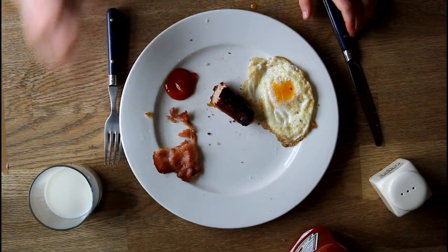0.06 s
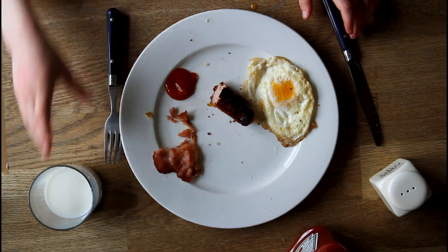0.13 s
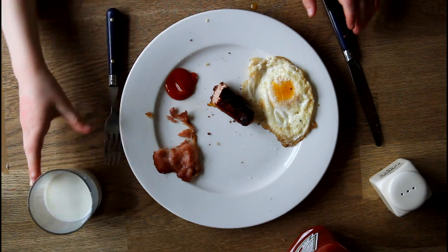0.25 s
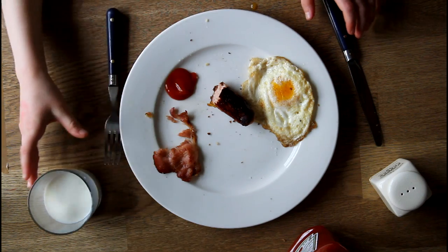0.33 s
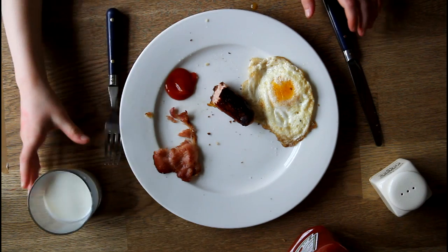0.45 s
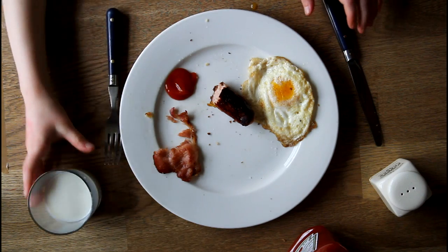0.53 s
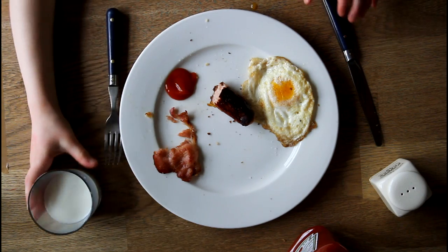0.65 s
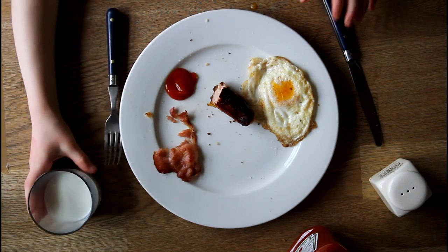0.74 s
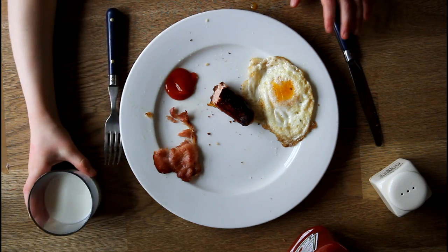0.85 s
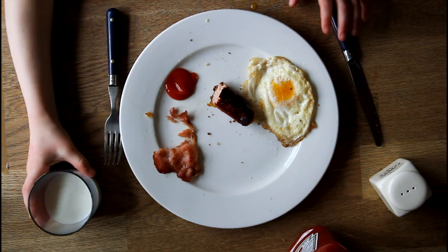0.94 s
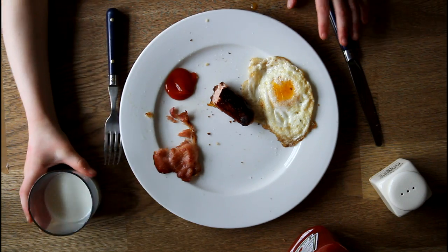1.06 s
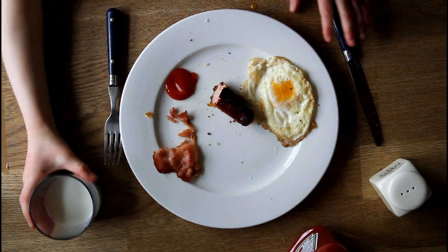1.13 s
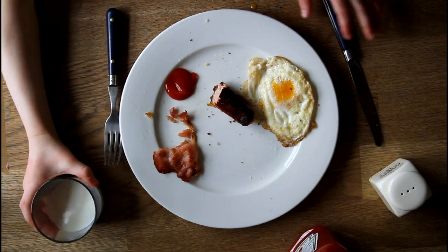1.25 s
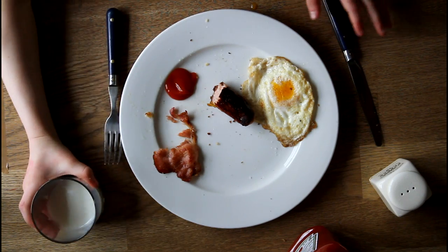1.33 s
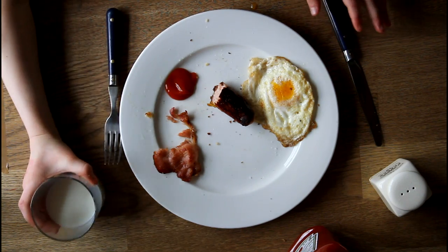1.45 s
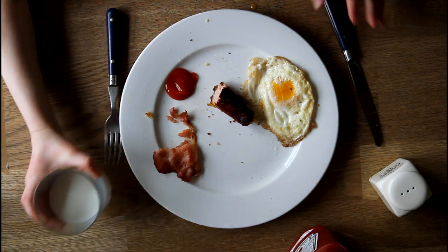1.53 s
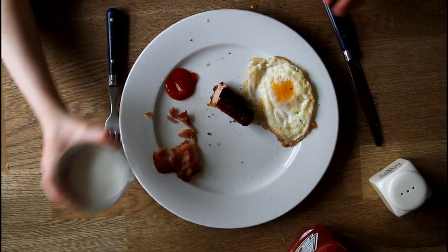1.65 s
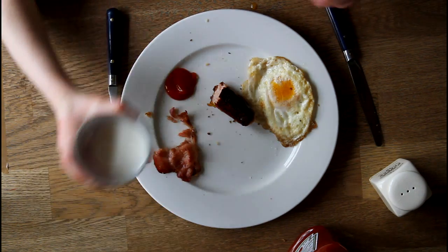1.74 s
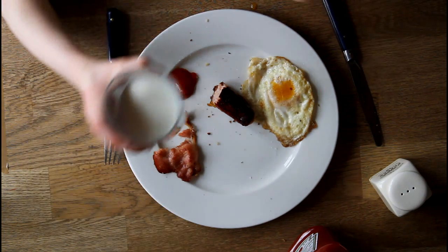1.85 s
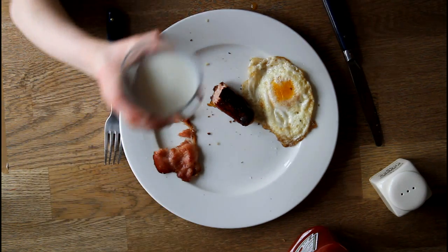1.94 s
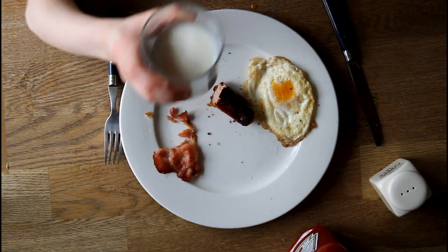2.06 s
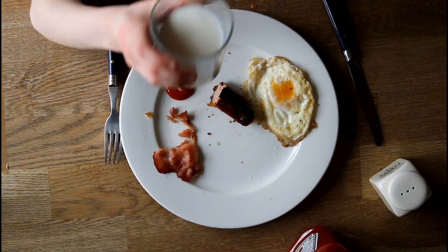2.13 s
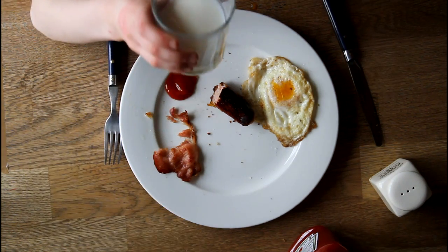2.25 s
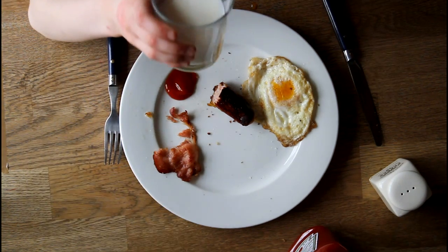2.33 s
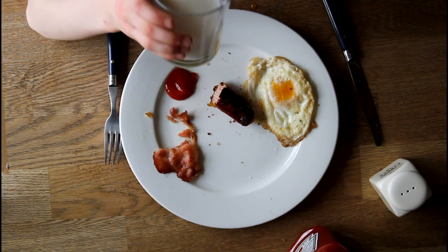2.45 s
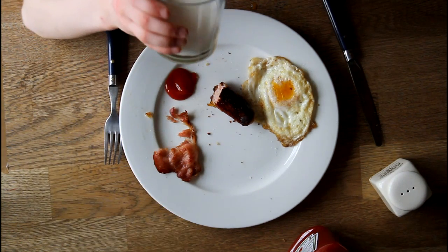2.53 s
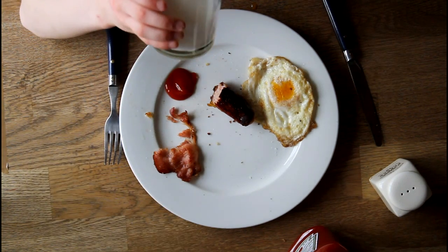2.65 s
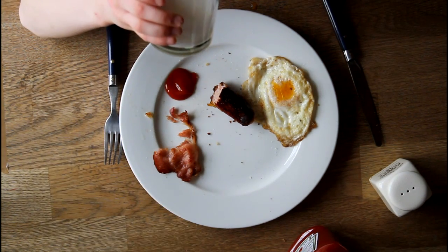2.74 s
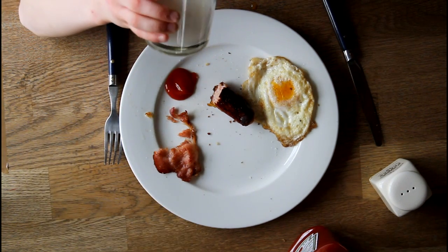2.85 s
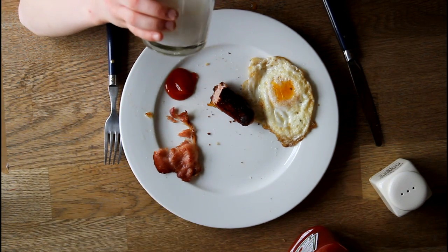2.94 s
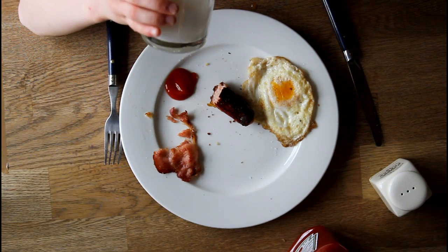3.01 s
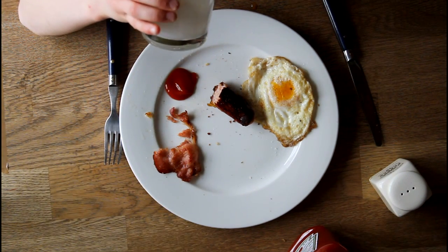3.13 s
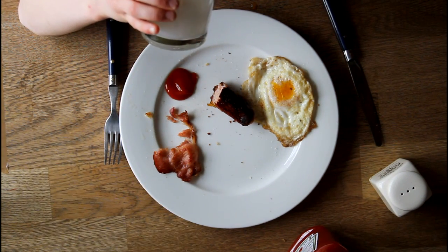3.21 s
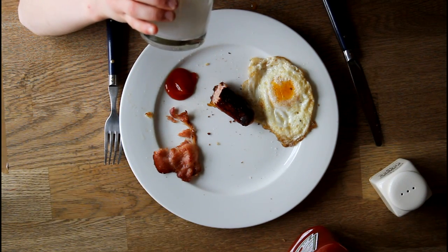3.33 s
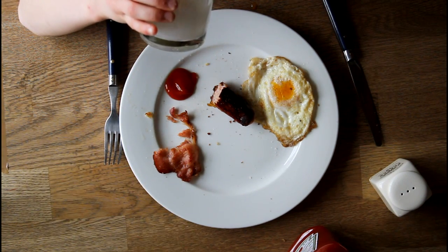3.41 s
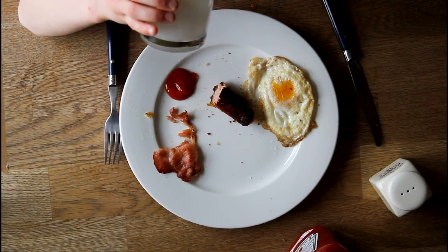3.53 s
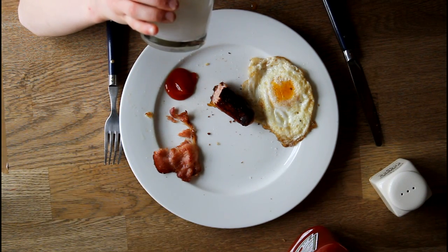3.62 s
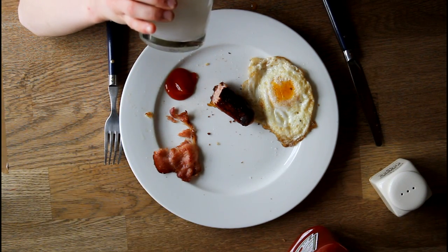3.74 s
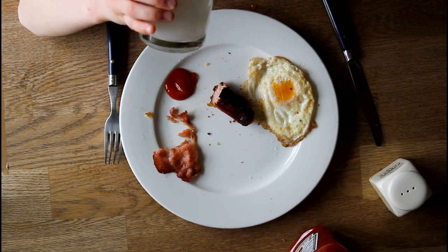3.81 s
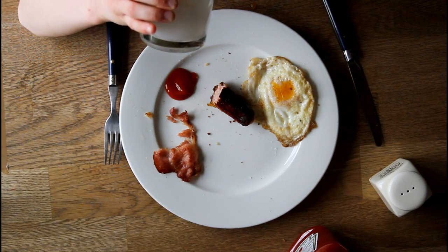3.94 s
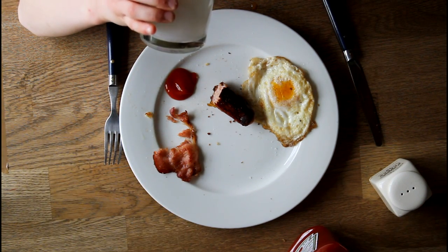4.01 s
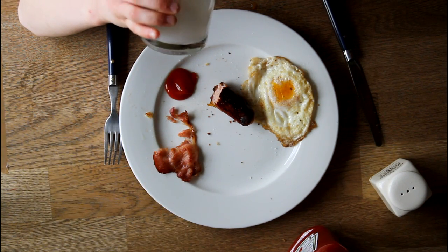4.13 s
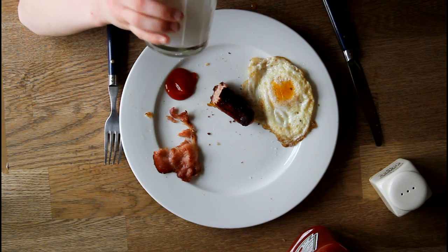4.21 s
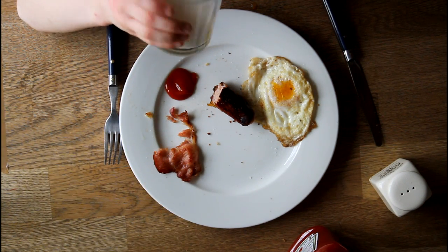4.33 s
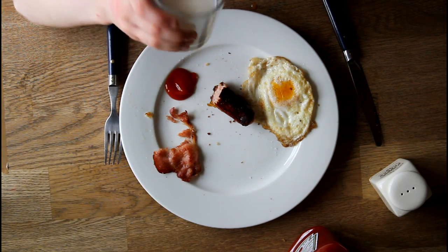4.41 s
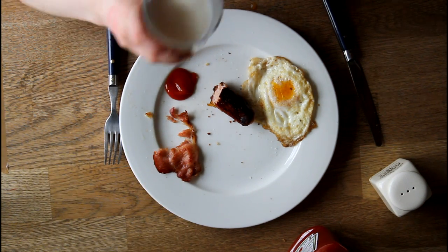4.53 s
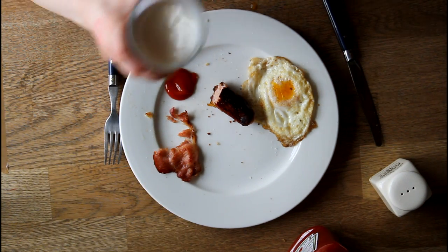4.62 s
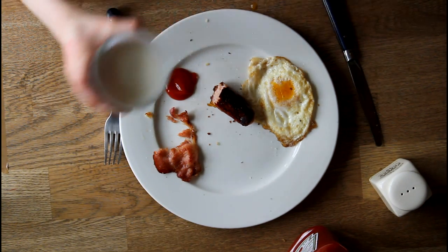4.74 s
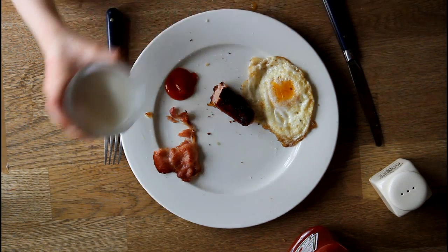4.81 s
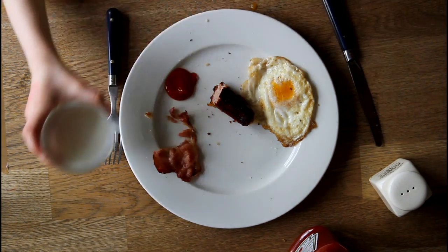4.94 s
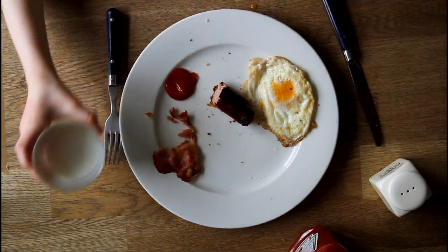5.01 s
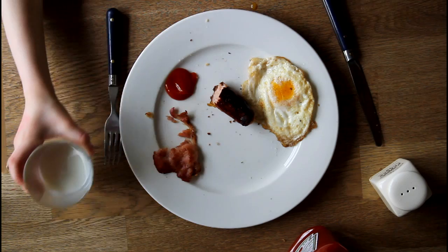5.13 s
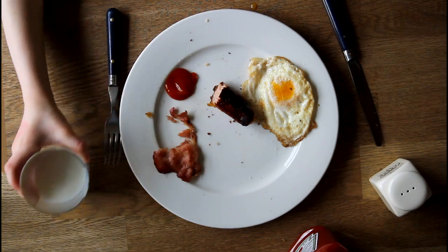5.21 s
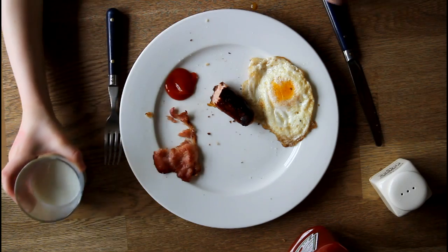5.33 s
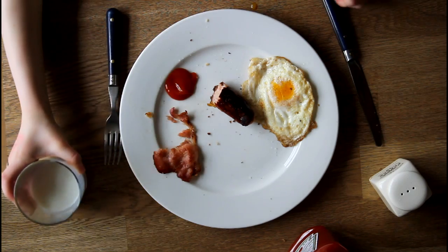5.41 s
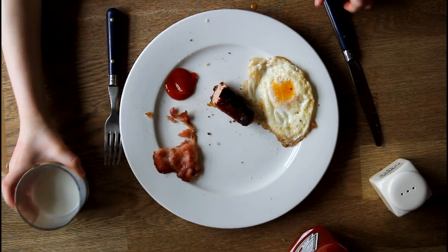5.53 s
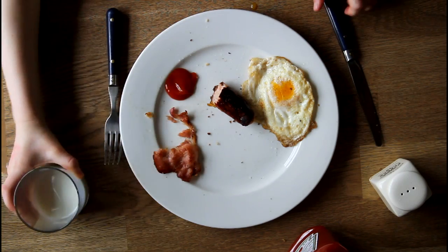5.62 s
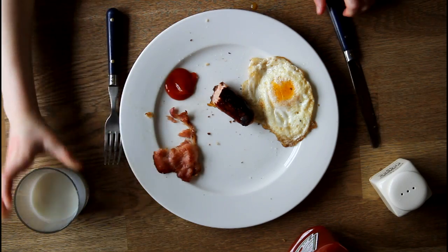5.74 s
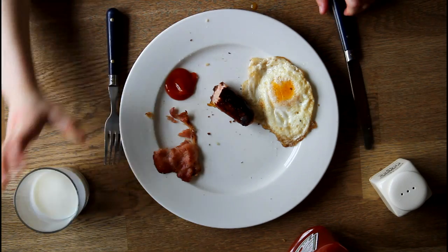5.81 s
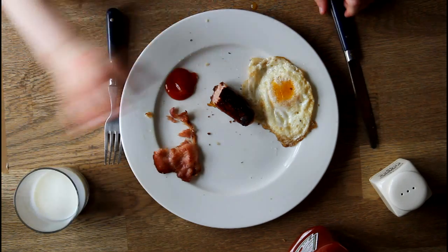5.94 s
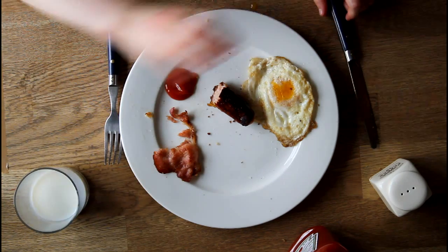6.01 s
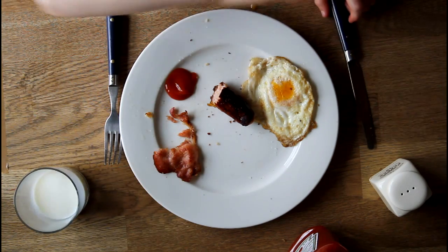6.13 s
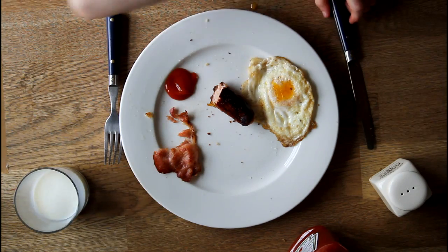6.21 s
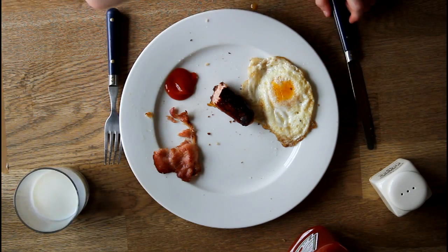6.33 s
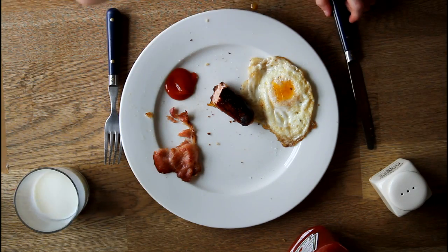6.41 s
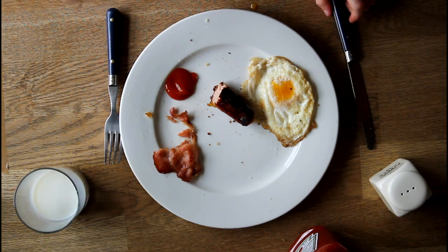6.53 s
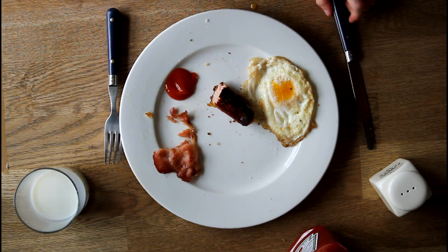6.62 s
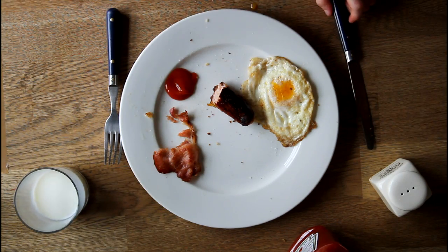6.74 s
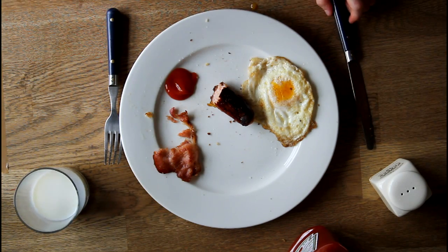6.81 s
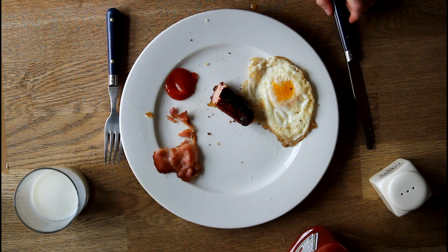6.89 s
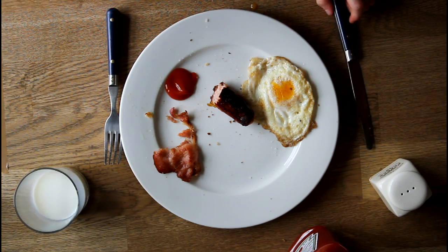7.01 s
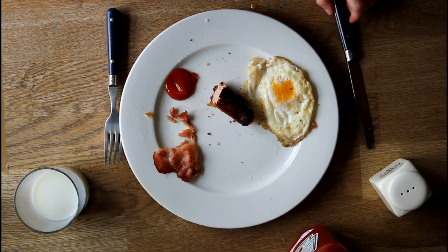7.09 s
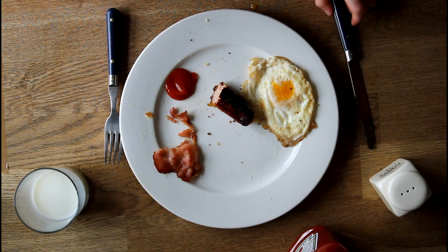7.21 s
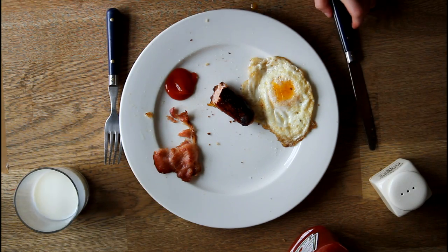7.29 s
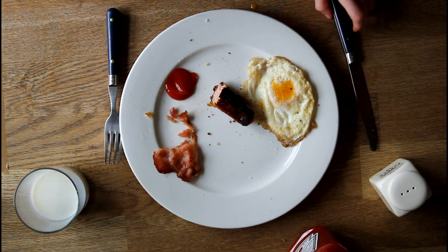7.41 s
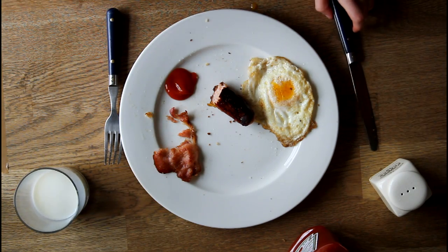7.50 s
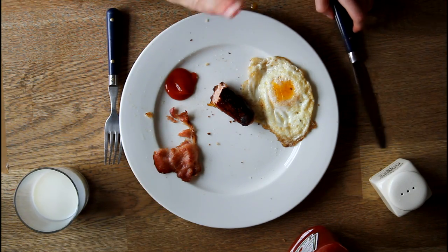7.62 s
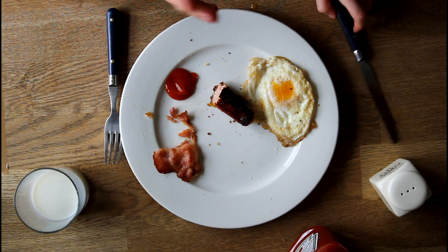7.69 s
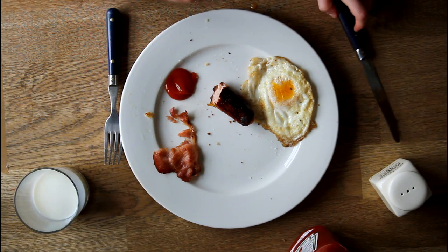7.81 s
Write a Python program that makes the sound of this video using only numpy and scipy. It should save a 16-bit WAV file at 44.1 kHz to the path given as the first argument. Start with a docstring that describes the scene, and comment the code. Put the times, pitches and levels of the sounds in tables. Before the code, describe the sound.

A low, slightly wavering appliance hum, strongest around 100 and 200 Hz, sits quietly under dull air in a bare, echoing room; the microphone is close to a wooden table. At 0.3 s a loud, hard knock of glass on wood rings for about half a second. Soft hand rubs pass between 0.7 and 1.7 s, with a faint hollow bump at 1.5 s. A very low, soft thump comes at 2.3 s. Small wet lip clicks of sipping occur at 2.15, 2.55, 2.75 and 3.0 s, with tiny gulps. Mostly hum remains until a faint click and gulp at 4.25 s and a tongue click at 5.1 s. Two loud knocks follow at 5.46 and 5.68 s, the second with a hollow thump and gritty settling. Milk slops faintly at 6.05 s. Delicate mouth clicks cluster from 6.4 to 7.3 s. At 7.65 s a knife scrapes briefly off the wood with thin metallic ticks.

```python
"""An appliance hums in a bare, echoing room, where breakfast is eaten at a wooden table.
A glass of milk knocks on the table as a hand takes it, is sipped with small wet lip clicks,
and is put down in two knocks, edge first and then flat. At the end a knife is drawn off the wood.
Knocks are sums of damped modes with a dense noise burst, clicks and friction are shaped noise,
hollow sounds are damped tones, and the hum is a set of wavering sinusoids over dull noise."""
import sys
import numpy as np
from scipy import signal
from scipy.fft import rfft, irfft
from scipy.io import wavfile
from scipy.ndimage import uniform_filter1d, minimum_filter1d

SR = 44100
rng = np.random.default_rng(int(sys.argv[2]) if len(sys.argv) > 2 else 0)


def digitize_waveform(pressure):
    """Quantize a signal to 16-bit integers and store it at the path in sys.argv[1].

    Rows of a 2-D input are taken as channels; values are limited to [-1, 1].
    """
    field = np.atleast_2d(pressure).T
    bounded = np.clip(field, -1, 1)
    quanta = np.round(bounded * 32767).astype(np.int16)
    wavfile.write(sys.argv[1], SR, quanta)


N = 346626
TIME = np.arange(N) / SR
AGE = TIME[:SR]   # the second that follows a contact

# Event levels are relative: each source adds its own trim. Spectra give the shape only.

# Glass or arm on the table:
# (time [s], level [dB], spot struck [0 gripped, 1 put down], hardness [pitch factor of the thud])
KNOCKS = [(0.3257, 3.5, 0, 1.066), (1.489, -33, 1, 0.29), (2.337, -33.5, 0, 0.98), (5.4575, 3, 1, 0.89),
          (5.6792, 2.5, 1, 1.04)]
# Modes of the table with the glass on it:
# (frequency [Hz], t60 [s], level when gripped [dB], level when put down [dB])
TABLE_MODES = [ (268, .6, -29, -30), (325, .55, -40, -29), (347, .55, -39, -26), (378, .5, -45, -28),
               (427, .55, -28, -26), (450, .45, -20, -18), (473, .4, -34, -23), (504, .5, -39, -27),
               (590, .35, -22, -26), (628, .35, -29, -21), (678, .55, -28, -28), (733, .5, -27, -34),
               (816, .5, -25, -24), (885, .45, -29, -29), (922, .5, -36, -28), (982, .55, -29, -25),
               (1020, .55, -25, -28), (1145, .6, -34, -28), (1190, .45, -27, -23), (1222, .55, -34, -27),
               (1268, .4, -22, -25), (1335, .5, -24, -34), (1385, .5, -27, -33), (1427, .5, -32, -28),
               (1610, .35, -33, -31), (1690, .45, -30, -42), (1981, .55, -38, -39), (2295, .58, -26, -48)]
# Dense, unresolved part of a knock: (frequency [Hz], density [dB per Hz])
THUD_SPECTRUM = [(30, -43), (70, -30), (120, -10.5), (230, -13.5), (400, -2), (700, 0.5), (1300, 1),
                 (1700, -6), (2200, -13), (2700, -20.5), (3300, -24), (4300, -34), (5500, -45.5),
                 (8000, -56), (15000, -69)]
KNOCK_RISE_S = .0012
KNOCK_TAIL_CUT_HZ = 4350   # the room swallows the treble above this
ROOM_T60_S = 0.63

# Base of the glass grinding and settling: (time [s], level [dB], chirp level [dB])
GRIT = [(5.458, -59.5, -43), (5.690, -46, -40.5), (5.796, -52.5, -65), (5.857, -60, -44), (5.932, -59, -51)]
# Small contacts of glass on wood: (frequency [Hz], density [dB per Hz])
GRIT_SPECTRUM = [(2000, -29), (6000, -17), (9000, 1.5), (12000, -5), (15500, -16)]
# Narrow chirp of the grinding base: (multiple of its pitch [1], density [dB per Hz])
CHIRP_SPECTRUM = [(.5, -30.5), (.88, -3), (1, 6), (1.1, -5), (1.3, -37), (2, -54.5)]
GRIT_T60_S, REBOUND_S, REBOUND_LOSS_DB = 0.071, 0.015, 8.5   # each contact rebounds once
# Blade catching on the wood: (time [s], level [dB])
BLADE = [(7.667, -53), (7.698, -41.5), (7.746, -50), (7.781, -39)]
# Steel on wood, both catches and friction: (frequency [Hz], density [dB per Hz])
STEEL_SPECTRUM = [(1500, -32), (4000, 6.5), (6000, 4.5), (9000, 3.5), (12000, 3), (15500, -11)]
BLADE_T60_S = 0.028

# Sips, the lips part and then smack:
# (time [s], parting level [dB], parting resonance [Hz], parting spray level [dB],
#  smack level [dB], smack resonance [Hz], smack spray level [dB], smack t60 [s])
SIPS = [(2.149, -38.5, 3640, -64, -42, 1710, -48, 0.15), (2.556, -35, 3430, -29.5, -36, 4600, -34, 0.18),
        (2.749, -35.5, 3200, -44.5, -40, 3200, -48, 0.15), (2.996, -49, 3460, -76, -36.5, 3960, -49, 0.063)]
PARTING_T60_S, SMACK_AFTER_S = 0.047, 0.01
# Single clicks of the tongue: (time [s], level [dB], mouth resonance [Hz])
TONGUE = [(0.735, -49.5, 3800), (1.569, -62, 3170), (1.784, -58.5, 4370), (2.301, -55.5, 4170),
          (4.248, -49, 2580), (5.133, -45.5, 3100), (6.510, -59.5, 4050), (6.577, -57, 4130),
          (6.630, -53, 4200), (6.918, -56, 4300), (7.021, -43, 4200), (7.138, -52.5, 3940),
          (7.219, -42, 2400), (7.306, -44, 4080)]
TONGUE_T60_S, TONGUE_RING_T60_S = 0.052, 0.051
TONGUE_SNAP_DB, TONGUE_RING_DB, TONGUE_SPRAY_DB = -0.5, -1.5, -55   # relative to the level asked for
# Spells of the mouth working, with faint clicks at random:
# (start [s], end [s], level above the usual [dB])
MOUTHING = [(1.744, 1.86, -4), (3.013, 3.13, -3), (6.44, 6.68, -2), (6.869, 7.161, 3)]
MOUTHING_COUNT = 14   # clicks in each spell
MOUTHING_DB, MOUTHING_SPREAD_DB = -66.5, 2
MOUTHING_HZ, MOUTHING_SPREAD_OCTAVES = 4260, 0.077
# Mouth click: (multiple of the mouth resonance [1], density [dB per Hz])
MOUTH_SPECTRUM = [(.15, -25), (.45, -15), (.74, -9), (.92, 0), (1.08, 0), (1.22, -10), (1.6, -22),
                  (2.2, -46), (3.5, -62)]
# Fine wet crackle on the lips: (frequency [Hz], density [dB per Hz])
SPRAY_SPECTRUM = [(300, -23), (700, -3), (1900, -2), (2500, -10), (4600, 3.5), (6500, -2), (8500, 0.5),
                  (12500, -1), (15800, -20)]
MOUTH_ROOM_T60_S, SPRAY_ROOM_T60_S = .4, .32

# Hollow sounds, an elbow on the table, gulps and milk slopping:
# (time [s], level [dB], frequency [Hz])
PLOPS = [(1.492, -39.5, 437), (2.32, -33.5, 72.3), (2.326, -39, 132), (2.766, -44, 1145),
         (3.003, -34, 1110), (3.115, -45.5, 1067), (4.247, -50, 940), (4.297, -53, 897), (5.663, -24, 344),
         (6.046, -38.5, 672), (6.104, -48, 636), (7.33, -50.5, 695)]
# Scattered sound around a hollow tone: (multiple of the tone [1], density [dB per Hz])
SCATTER_SPECTRUM = [(.3, -39.5), (.8, -4), (1, 23), (1.2, -13), (3, -61)]
PLOP_TONE_T60_S, PLOP_SCATTER_T60_S = 0.065, 0.26   # both at 1 kHz
PLOP_T60_SLOPE = 0.29   # lower tones ring longer by this power of the pitch

# Strokes of a hand or arm on the wood:
# (start [s], length [s], wood level [dB], friction hiss level [dB])
HANDS = [(0.69, .14, -69, -73), (0.88, 0.23, -45, -75), (1.14, .23, -39, -62.5), (1.42, 0.27, -58.5, -108),
         (2.17, 0.28, -55.5, -73.5)]
# The single stroke that draws the knife off:
# (start [s], length [s], wood level [dB], friction hiss level [dB])
KNIFE = [(7.64, 0.27, -38, -56.5)]
# Wood under a hand: (frequency [Hz], density [dB per Hz])
HANDS_WOOD_SPECTRUM = [(80, -30), (220, 0), (450, 6.5), (800, -3), (1800, -16), (3000, -24.5), (4700, -28),
                       (7000, -43.5), (15000, -57)]
# Skin on wood: (frequency [Hz], density [dB per Hz])
HANDS_HISS_SPECTRUM = [(3000, 2), (6000, -5.5), (8000, -13), (11000, -3.5), (13500, -9), (15500, -18)]
# Wood under the knife: (frequency [Hz], density [dB per Hz])
KNIFE_WOOD_SPECTRUM = [(80, -35), (250, -22), (480, 8.5), (750, -8.5), (1400, -17.5), (1700, -9.5),
                       (2000, -21.5), (3500, -24), (7000, -44)]
WOOD_LAG_S = 0.027   # the surface hisses first, the wood answers as the pressure grows

# A faint hiss that comes and goes: (start [s], end of hold [s], level [dB])
FAINT_HISS = [(0.141, 0.525, -57.5), (0.79, 1.296, -63), (2.334, 2.56, -61.5), (3.454, 5.41, -72.5),
              (6.047, 7.346, -72.5)]
# Its spectrum: (frequency [Hz], density [dB per Hz])
FAINT_HISS_SPECTRUM = [(400, -16.5), (1200, 9.5), (3200, 3), (4000, -5), (5200, -10.5), (7000, -30.5),
                       (12000, -48)]
FAINT_HISS_FADE_S = 0.13

# Lines of the appliance: (frequency [Hz], level before waver [dB rms], waver spread [dB])
HUM = [(73, -70.5, 3.5), (100.1, -51, .5), (121, -56.5, 2), (138.5, -71.5, 1), (283.7, -55, 1),
       (304, -67, 4)]
# A mains harmonic beats against a motor line just above it
MAINS_HARMONIC_HZ, BEAT_HZ = 200.2, 1.4
HARMONIC_DB, MOTOR_LINE_DB, HARMONIC_WAVER_DB = -50.5, -62, 1.67
# The room's steady murmur: (frequency [Hz], density [dB per Hz])
AIR_SPECTRUM = [(25, -22), (50, -9.5), (70, -0.5), (150, -0.5), (220, 1), (420, -3), (650, -9),
                (1100, -14.5), (2000, -20.5), (3100, -37), (4500, -58.5), (7000, -65.5), (16000, -64.5)]
AIR_DB = -50   # rms

LIMIT, CUTOFF_HZ = .85, 15900


def knocks(ring_db, thud_db):
    """Modal superposition: an impact excites damped modes and a dense thud, brighter if harder."""
    out = np.zeros(N)
    for s, db, spot, hardness in KNOCKS:
        ring = 0
        for hz, t60, gripped_db, put_down_db in TABLE_MODES:
            mode_db = put_down_db if spot > .5 else gripped_db
            strength = from_db(mode_db + rng.normal(0, 1))
            phase_turns = rng.random()
            ring = ring + strength * dying(t60) * np.sin(2 * np.pi * (hz * AGE + phase_turns))
        burst = noise(THUD_SPECTRUM, size=SR, scale=hardness, ripple_db=3.0)
        thud = in_room(burst, contact_t60=0.11, room_db=-4.5, room_t60=ROOM_T60_S)
        knock = from_db(ring_db) * ring + from_db(thud_db) * thud
        add(out, s, from_db(db) * onset(KNOCK_RISE_S) * knock)
    return out


def ticks(grit_db, blade_db, chirp_hz):
    """Brief contact: tiny hard touches of glass and steel on wood excite mostly treble."""
    out = np.zeros(N)
    for s, db, chirp_db in GRIT:
        for delay, loss_db in ((0, 0), (REBOUND_S, REBOUND_LOSS_DB)):
            grit = crackle(GRIT_SPECTRUM, GRIT_T60_S, room_db=-10.0, room_t60=0.43)
            chirp = crackle(CHIRP_SPECTRUM, GRIT_T60_S, room_db=-7.0, room_t60=0.67, scale=chirp_hz)
            add(out, s + delay, from_db(db + grit_db - loss_db) * grit)
            add(out, s + delay, from_db(chirp_db - loss_db) * chirp)
    for s, db in BLADE:
        catch = crackle(STEEL_SPECTRUM, BLADE_T60_S, room_db=-10.5, room_t60=0.3)
        add(out, s, from_db(db + blade_db) * catch)
    return out


def lips(click_db, spray_db):
    """Rupture of wet films: sips part and smack the lips, the tongue clicks, the mouth works faintly."""
    out = np.zeros(N)
    for s, part_db, part_hz, part_spray_db, smack_db, smack_hz, smack_spray_db, smack_t60 in SIPS:
        parting = wet_click(part_db + click_db, part_hz, PARTING_T60_S, part_spray_db + spray_db)
        smack = wet_click(smack_db + click_db, smack_hz, smack_t60, smack_spray_db + spray_db)
        add(out, s, parting)
        add(out, s + SMACK_AFTER_S, smack)
    for s, db, hz in TONGUE:
        add(out, s, tongue_click(db, hz))
    for start, end, db in MOUTHING:
        for k in range(MOUTHING_COUNT):
            s = start + (end - start) * (k + rng.random()) / MOUTHING_COUNT
            hz = MOUTHING_HZ * 2 ** (MOUTHING_SPREAD_OCTAVES * rng.standard_normal())
            click_level_db = MOUTHING_DB + db + MOUTHING_SPREAD_DB * rng.standard_normal()
            add(out, s, tongue_click(click_level_db, hz))
    return out


def wet_click(db, hz, length, treble_db):
    """Cavity resonance: a snapping film rings the mouth briefly and fine droplets add treble."""
    mouth = crackle(MOUTH_SPECTRUM, length, room_db=-6.5, room_t60=MOUTH_ROOM_T60_S, scale=hz)
    spray = crackle(SPRAY_SPECTRUM, length, room_db=-2.5, room_t60=SPRAY_ROOM_T60_S)
    return from_db(db) * mouth + from_db(treble_db) * spray


def tongue_click(db, hz):
    """Free oscillation: a snap inside the mouth rings it clearly for a moment, with little spray."""
    tone = np.sin(2 * np.pi * hz * AGE) * dying(TONGUE_RING_T60_S) * onset(0.00075)
    snap = wet_click(db + TONGUE_SNAP_DB, hz, TONGUE_T60_S, db + TONGUE_SPRAY_DB)
    return from_db(db + TONGUE_RING_DB) * tone + snap


def plops(level_db, scatter_db, rise_cycles):
    """Damped resonance: a soft push on a hollow body builds one tone, smeared by the room."""
    out = np.zeros(N)
    for s, db, hz in PLOPS:
        longer = (hz / 1000) ** -PLOP_T60_SLOPE
        tone = np.sin(2 * np.pi * hz * AGE) * dying(PLOP_TONE_T60_S * longer)
        around = noise(SCATTER_SPECTRUM, size=SR, scale=hz, tilt_db=-3.0)
        scatter = from_db(scatter_db) * around * dying(PLOP_SCATTER_T60_S * longer)
        add(out, s, from_db(db + level_db) * onset(rise_cycles / hz) * (tone + scatter))
    return out


def slide(strokes, wood_spectrum, hiss_spectrum, wood_db, hiss_db, grain_db):
    """Friction: an uneven rubbing force makes the wood murmur and the surface hiss."""
    wood_level, hiss_level = 0, 0
    for s, length, stroke_wood_db, stroke_hiss_db in strokes:
        wood_level = wood_level + from_db(stroke_wood_db + wood_db) * swell(s + WOOD_LAG_S, length)
        hiss_level = hiss_level + from_db(stroke_hiss_db + hiss_db) * swell(s, length)
    body = wood_level * noise(wood_spectrum, size=N, ripple_db=4.0)
    surface = hiss_level * noise(hiss_spectrum, size=N)
    return (body + surface) * from_db(grain_db * drift(rate=160))


def swell(start, length):
    """Stroke kinematics: a stroke gathers speed and slows down again."""
    return np.sin(np.pi * np.clip((TIME - start) / length, 0, 1)) ** 2


def faint_hiss(flicker_db):
    """Amplitude-modulated noise: a soft hiss fades in, holds with a flicker and fades out."""
    level = 0
    for start, end, db in FAINT_HISS:
        fade_in = np.clip((TIME - start) / FAINT_HISS_FADE_S, 0, 1) ** 2
        fade_out = np.clip((end + FAINT_HISS_FADE_S - TIME) / FAINT_HISS_FADE_S, 0, 1) ** 2
        level = level + from_db(db) * fade_in * fade_out
    return level * from_db(flicker_db * drift(rate=15)) * noise(FAINT_HISS_SPECTRUM, size=N)


def background():
    """Line spectrum with beats: mains and motor lines waver over the dull air of the room."""
    hum = sum(line(hz, db + waver_db * drift(rate=5)) for hz, db, waver_db in HUM)
    harmonic = line(MAINS_HARMONIC_HZ, HARMONIC_DB + HARMONIC_WAVER_DB * drift(rate=5))
    motor = line(MAINS_HARMONIC_HZ + BEAT_HZ, MOTOR_LINE_DB)
    air = from_db(AIR_DB) * noise(AIR_SPECTRUM, size=N)
    return hum + harmonic + motor + air


def line(hz, db):
    """Pure tone: a sinusoid whose peak is the square root of two times its rms level."""
    return from_db(db) * np.sqrt(2) * np.sin(2 * np.pi * hz * TIME)


def crackle(spectrum, length, room_db, room_t60, scale=1, grain_db=4.5, ripple_db=3.0):
    """Reverberant build-up: the longer a run of snaps, the more it fills the room's duller tail."""
    grain = rms_one(from_db(grain_db * drift(rate=750, size=SR)))
    snaps = noise(spectrum, size=SR, scale=scale, ripple_db=ripple_db) * grain
    tail = noise(spectrum, size=SR, scale=scale, tilt_db=-2.5, ripple_db=ripple_db)
    tail_level = from_db(room_db) * np.sqrt(length / room_t60)
    return snaps * dying(length) * onset(0.00067) + tail_level * tail * dying(room_t60) * onset(0.0081)


def in_room(sound, contact_t60, room_db, room_t60):
    """Direct and diffuse fields: a quick burst, then the room's tail, which lacks the top treble."""
    lowpass = signal.butter(2, KNOCK_TAIL_CUT_HZ, fs=SR, output="sos")
    dull = signal.sosfiltfilt(lowpass, sound)
    direct = dying(contact_t60)
    diffuse = from_db(room_db) * dying(room_t60)
    return dull * np.hypot(direct, diffuse) + (sound - dull) * direct   # energies add


def onset(rise_s):
    """Finite contact time: the force of a contact starts smoothly."""
    return 1 - np.exp(-(AGE / rise_s) ** 2)


def dying(t60):
    """Exponential decay: the level falls 60 dB in t60 seconds (2 ms at least)."""
    return from_db(-60 * AGE / max(t60, .002))


def noise(spectrum, size, scale=1, tilt_db=0, ripple_db=0):
    """Spectral shaping: unit noise scaled in pitch, tilted per octave, rippled by near reflections."""
    hz, db = np.transpose(spectrum)
    bins = np.maximum(np.fft.rfftfreq(size, 1 / SR), 1)
    octaves = np.log2(bins)
    knots = np.arange(0, SR / 2, 45)   # one ripple value every 45 Hz
    ripple = np.interp(bins, knots, rng.standard_normal(len(knots)))
    ripple = ripple * np.minimum(bins / 1500, 1)   # shallower in the bass
    shape_db = np.interp(octaves, np.log2(hz * scale), db) + tilt_db * octaves + ripple_db * ripple
    white = rfft(rng.standard_normal(size))
    return rms_one(irfft(white * from_db(shape_db), size))


def drift(rate, size=N):
    """Slow random modulation: straight lines join random values, rate per second, to unit rms."""
    knots = rng.standard_normal(int(size / SR * rate) + 2)
    return rms_one(np.interp(TIME[:size] * rate, np.arange(len(knots)), knots))


def from_db(db):
    """Logarithmic level: decibels to amplitude gain."""
    return 10 ** (np.asarray(db) / 20)


def rms_one(x):
    """Normalisation: scale to unit rms."""
    return x / np.sqrt(np.mean(x ** 2) + 1e-20)


def add(out, s, sound):
    """Linear superposition: mix a sound in, starting at time s."""
    start = int(round(s * SR))
    out[start:start + len(sound)] += sound[:N - start]


def scene():
    """Superposition of sources: everything at the table sums at one microphone."""
    contacts = knocks(ring_db=-3.5, thud_db=-14.5) + ticks(grit_db=-1.0, blade_db=1.0, chirp_hz=4000)
    mouth = lips(click_db=-0.5, spray_db=2.0)
    hollow = plops(level_db=5.0, scatter_db=-8.0, rise_cycles=1.26)
    hands = slide(HANDS, HANDS_WOOD_SPECTRUM, HANDS_HISS_SPECTRUM, wood_db=-1.5, hiss_db=5.5, grain_db=1.5)
    knife = slide(KNIFE, KNIFE_WOOD_SPECTRUM, STEEL_SPECTRUM, wood_db=-1.5, hiss_db=-6.5, grain_db=1.0)
    return (contacts + mouth + hollow + hands + knife + faint_hiss(flicker_db=4.5) + background())[None]


def record(dry):
    """Gain limiting and band limiting: the highest peaks are held down and the top is cut steeply."""
    allowed = minimum_filter1d(LIMIT / np.maximum(np.abs(dry), LIMIT), size=265)
    gain = uniform_filter1d(uniform_filter1d(allowed, size=131), size=131)   # about 3 ms each
    lowpass = signal.ellip(10, .1, 80, CUTOFF_HZ, fs=SR, output="sos")
    return signal.sosfilt(lowpass, dry * gain)


dry = scene()
out = record(dry)
digitize_waveform(out)
```